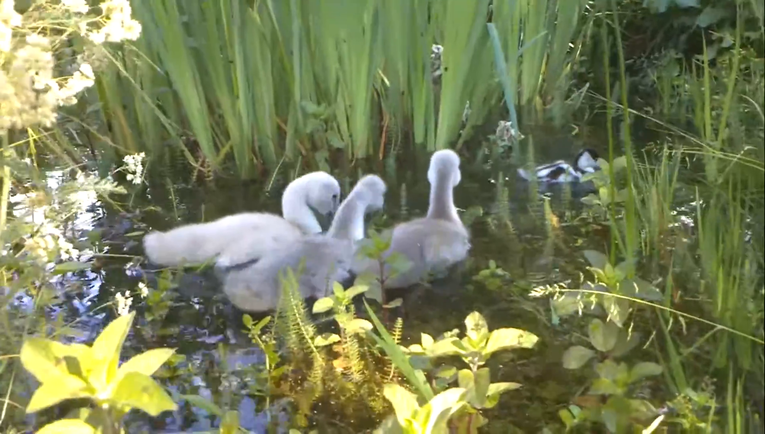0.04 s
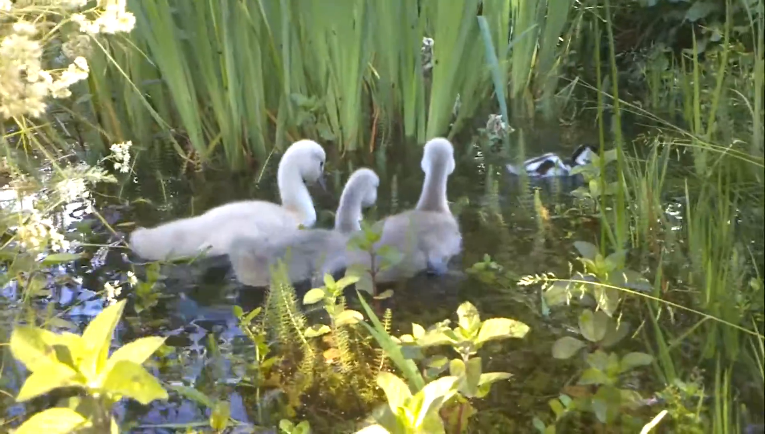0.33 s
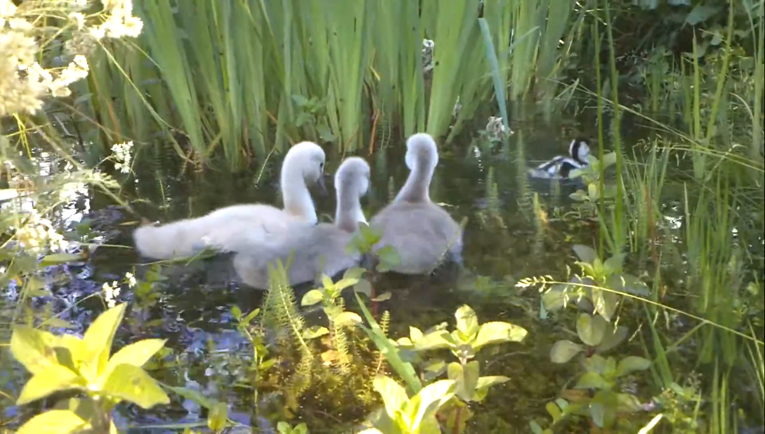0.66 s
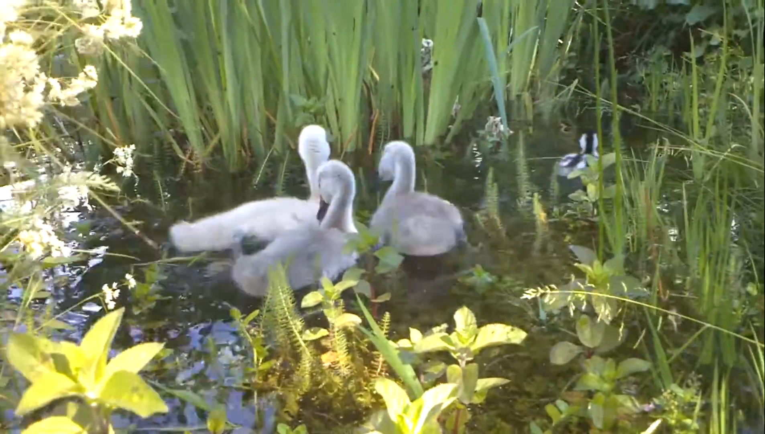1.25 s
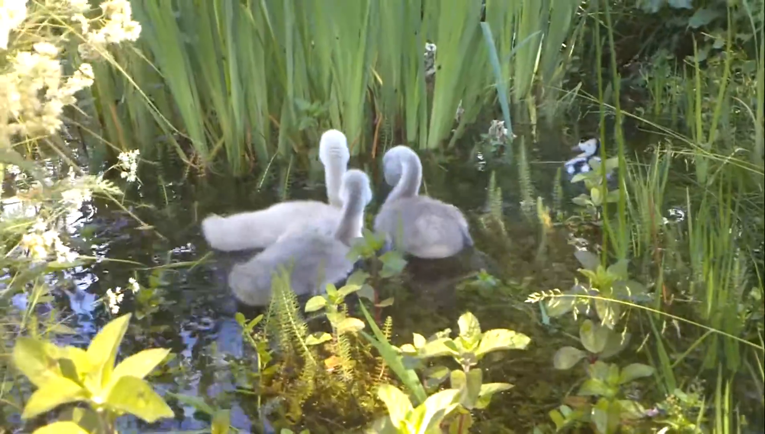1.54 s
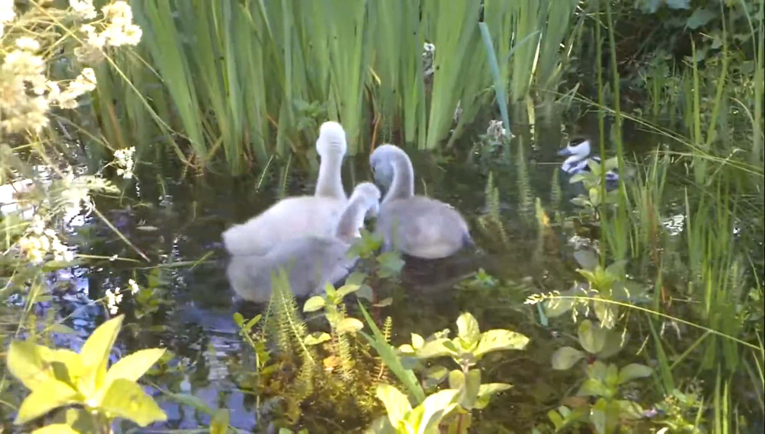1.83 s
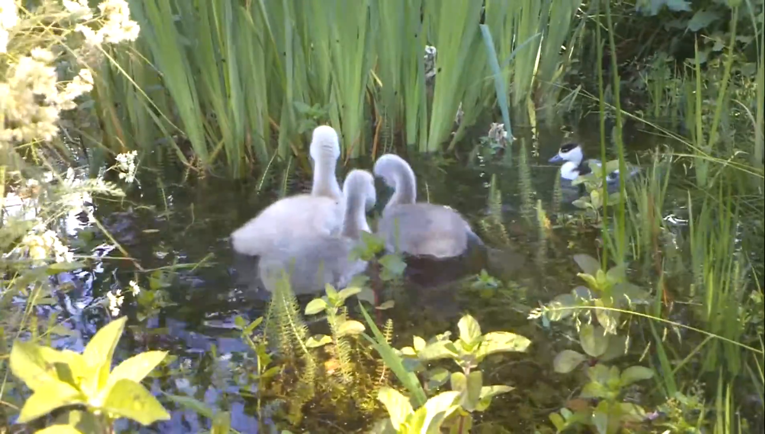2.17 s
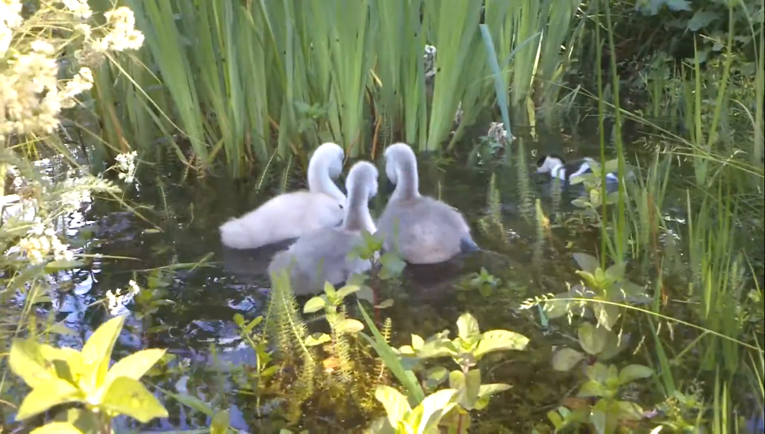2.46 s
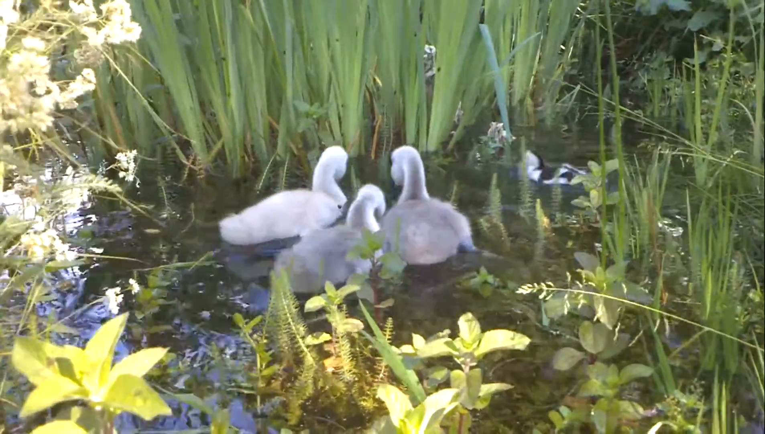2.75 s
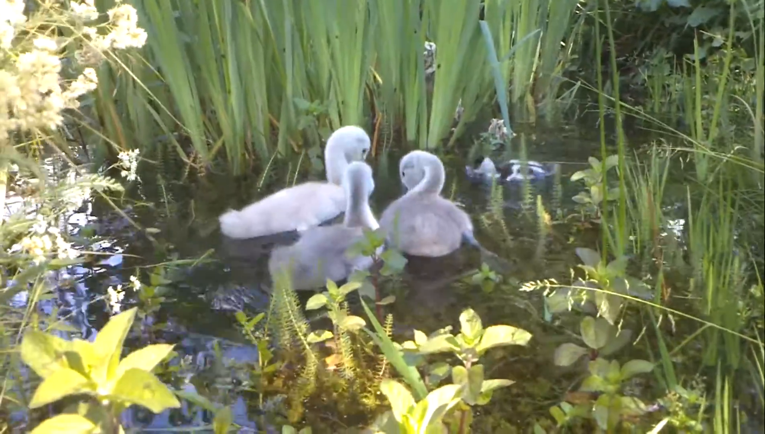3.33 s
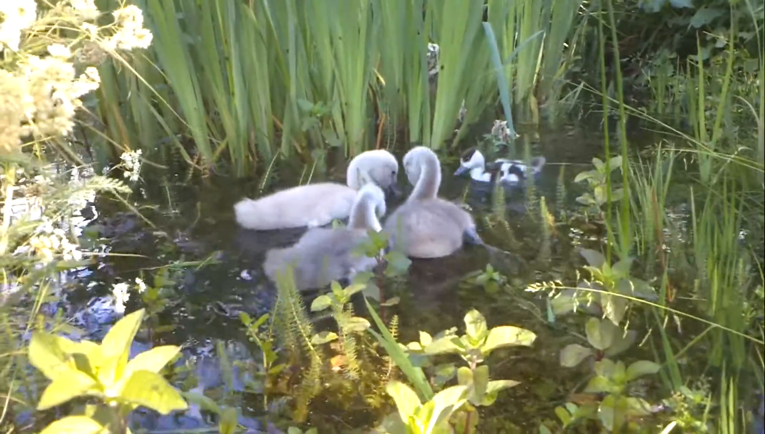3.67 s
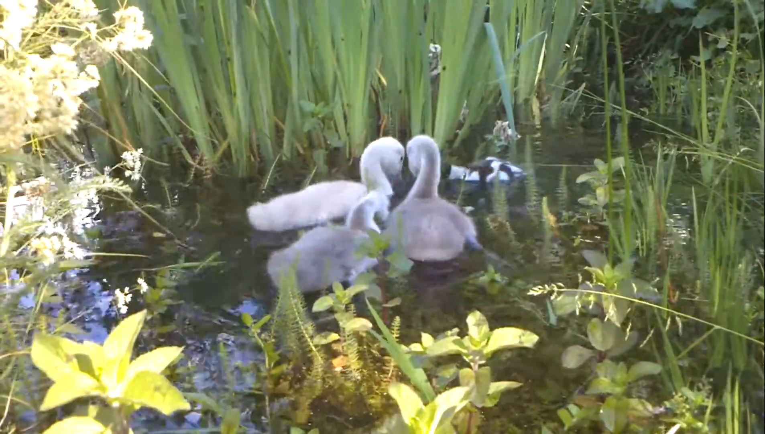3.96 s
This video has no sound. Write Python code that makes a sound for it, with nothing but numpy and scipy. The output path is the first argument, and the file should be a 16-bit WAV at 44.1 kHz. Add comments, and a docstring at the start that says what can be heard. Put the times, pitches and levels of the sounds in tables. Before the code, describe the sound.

Faint peeps and chirps of young waterbirds, with small splashes, hiss and low wind buffets.

```python
"""Cygnets on a reedy pond

Cygnets paddle and give soft arched peeps; another young bird runs off short falling chips.
Both calls reflect off the bank. Bills dabble: drops tick on the water, small splashes fizz
and a few bubbles rise. A light wind buffets the microphone over a steady high hiss."""
import sys
import numpy as np
from scipy import signal
from scipy.fft import rfft, irfft
from scipy.io import wavfile
from scipy.ndimage import uniform_filter1d

SR = 44100
rng = np.random.default_rng(int(sys.argv[2]) if len(sys.argv) > 2 else 0)


def pcm_store(signal):
    """Save signal as 16-bit PCM."""
    levels = np.round(np.clip(np.atleast_2d(signal), -1, 1) * 32767)
    wavfile.write(sys.argv[1], SR, levels.astype(np.int16).T)


N = 176400


def undb(db):
    """Decibels to gain."""
    return 10 ** (np.asarray(db) / 20)


def unit(x):
    """Scale to rms 1."""
    return x / np.sqrt(np.mean(x ** 2) + 1e-20)


def add(out, start_s, x):
    """Mix x into out at start_s."""
    i = max(int(start_s * SR), 0)
    out[i:i + len(x)] += x[:max(len(out) - i, 0)]


def curve(rows):
    """Join (time [s], value) rows by straight lines."""
    return np.interp(np.arange(N) / SR, *np.array(rows).T)


def band(x, hz, width_hz):
    """One resonance applied twice for steep sides, rms 1."""
    b, a = signal.iirpeak(min(hz, SR / 2 - 1), hz / min(width_hz, SR / 4), fs=SR)
    return unit(signal.lfilter(b, a, signal.lfilter(b, a, x)))


def coloured(spectrum):
    """Noise shaped by (frequency [Hz], density [dB]) rows, rms 1."""
    hz, db = np.array(spectrum).T
    bins_hz = np.arange(N // 2 + 1) * SR / N
    gain = undb(np.interp(np.log(bins_hz + 1), np.log(hz), db))
    return unit(irfft(rfft(rng.standard_normal(N)) * gain, N))


def wander(rate_hz, size=N):
    """Smooth random drift, rms about 1."""
    span = max(int(SR / rate_hz), 1)
    return unit(uniform_filter1d(uniform_filter1d(rng.standard_normal(N), span), span))[:size]


def thump(hz, t):
    """One smooth pressure swing centred on t = 0."""
    u = np.pi * hz * t
    return (1 - 2 * u ** 2) * np.exp(-u ** 2)


# gust strength (time [s], level [dB])
GUSTS = [(0, -42), (.3, -48), (.56, -40), (.8, -39), (1.0, -45.5), (1.13, -36.5), (1.33, -43.5),
         (1.55, -42), (1.8, -47), (1.9, -38), (2.06, -41.5), (2.16, -35), (2.62, -34.5), (2.8, -40),
         (2.99, -40), (3.07, -48.5), (3.25, -40), (3.34, -50.5), (3.52, -42), (3.7, -47.5), (3.83, -41),
         (4, -35)]
# turbulence spectrum (frequency [Hz], relative density [dB])
WIND_SPECTRUM = [(15, -5), (22, 4), (58, 1), (100, -7.5), (150, -16.5), (240, -24.5), (320, -36.5),
                 (450, -61), (800, -90)]
# single eddies (time [s], level [dB], pitch [Hz])
EDDIES = [(0.38, -32.5, 66), (0.545, -26.5, 47), (1.129, -27, 57.5), (1.558, -31, 95), (1.893, -31, 51),
          (2.139, -26, 55), (2.185, -28.5, 85.4), (2.231, -21.5, 69), (2.273, -24, 109), (2.356, -25.5, 71),
          (2.47, -25.5, 78), (2.537, -24, 55), (2.651, -24, 89), (2.806, -39.5, 130), (3.817, -31.5, 86)]


def wind():
    """Low turbulence follows the gusts; eddies thump the microphone and stir a brief flutter."""
    out = coloured(WIND_SPECTRUM) * undb(curve(GUSTS) + 1.5 * wander(rate_hz=54))
    flutter = undb(-25.5) * band(rng.standard_normal(N), hz=130, width_hz=134)
    flutter_s, cutoff_hz = 0.016, 333
    for centre_s, db, hz in EDDIES:
        t = np.arange(N) / SR - centre_s
        sharp_front = undb(-16) * thump(2.18 * hz, t)
        out += undb(db) * (thump(hz, t) + sharp_front + flutter * np.exp(-(t / flutter_s) ** 2))
    return signal.sosfilt(signal.butter(4, cutoff_hz, fs=SR, output="sos"), out)


# hiss spectrum (frequency [Hz], relative density [dB])
HISS_SPECTRUM = [(100, 0), (300, -3.5), (550, -7), (800, -8.5), (1200, -7), (1600, -6.5), (2050, -11),
                 (2600, -12), (4000, -9.5), (6900, -9.5), (9000, -5), (10200, -3), (11100, -9.5),
                 (12000, -16.5), (13000, -38)]
# hiss strength (time [s], level [dB])
HISS_LEVEL = [(0, -57.5), (.7, -58.5), (2.3, -58.5), (4, -60)]


def hiss():
    """Steady broadband noise with a slight waver in level."""
    return coloured(HISS_SPECTRUM) * undb(curve(HISS_LEVEL) + 0.66 * wander(rate_hz=11))


def droplets(size, hz, log_spread, per_s, decay_cycles):
    """Many tiny bubbles, each ringing briefly at its own pitch and strength; rms 1."""
    out, t = np.zeros(size), np.arange(SR // 50) / SR
    count = int(per_s * size / SR) + 2
    for position, up, down, strength in rng.random((N // 50, 4))[:count]:
        ring_hz = min(hz * np.exp(log_spread * np.sqrt(6) * (up - down)), SR / 3)
        ring = np.sin(2 * np.pi * ring_hz * t * (1 + 4 * t)) * np.exp(-ring_hz * t / decay_cycles)
        scatter_db = 2 * min(-np.log(1 - strength), 4)
        add(out, position * size / SR, undb(scatter_db) * ring)
    return unit(out)


# low wash of stirred water (time [s], level [dB])
WASH_LEVEL = [(0, -82), (1.2, -75), (3, -70), (4, -68)]
# gurgle of paddling (time [s], level [dB])
GURGLE_LEVEL = [(0, -75), (1.6, -72.5), (1.85, -65.5), (2.4, -72), (2.9, -68.5), (3.4, -65), (4, -67)]
# trickle off the bills (time [s], level [dB])
TRICKLE_LEVEL = [(0, -73), (2.4, -80), (2.9, -68), (3.15, -70), (3.45, -61), (3.7, -77), (4, -69)]


def lapping():
    """Paddling stirs a faint wash and gurgle; water trickles off the bills."""
    wash = band(rng.standard_normal(N), hz=450, width_hz=520)
    gurgle = droplets(N, hz=1434, log_spread=0.397, per_s=260, decay_cycles=2.24)
    trickle = droplets(N, hz=4210, log_spread=0.329, per_s=700, decay_cycles=5.6)
    return (undb(curve(WASH_LEVEL)) * wash + undb(curve(GURGLE_LEVEL)) * gurgle
            + undb(curve(TRICKLE_LEVEL)) * trickle)


def whistle(hz, fade_share, flutter_db, octave_db):
    """An unsteady tone that swells and fades; its octave is strongest midway."""
    n = len(hz)
    u = np.linspace(0, 1, n)
    jitter = 1 + 0.011 * wander(rate_hz=320, size=n)
    phase = 2 * np.pi * np.cumsum(hz * jitter) / SR
    swell = np.sin(np.pi / 2 * np.clip(np.minimum(u, 1 - u) / fade_share, 0, 1))
    flutter = undb(flutter_db * wander(rate_hz=190, size=n))
    octave = undb(octave_db) * np.exp(-((u - 0.5) / 0.58) ** 2) * np.sin(2 * phase)
    return np.sqrt(2) * swell * flutter * (np.sin(phase) + octave)


def bank_reflection(call, lag_ms, echo_db):
    """A call plus its echo off the bank; as the pitch glides, the two add and cancel in turn."""
    gap, echo_gain = np.zeros(int(lag_ms * SR / 1000)), undb(echo_db)
    return (np.r_[call, gap] + echo_gain * np.r_[gap, call]) / np.hypot(1, echo_gain)


# arched calls (time [s], length [s], top pitch [Hz], arch depth [share of top pitch], level [dB],
# octave re fundamental [dB], echo lag [ms])
PEEP_CALLS = [(0.029, 0.07, 2696, 0.15, -53, -30, 2.6), (0.119, 0.056, 2585, .07, -59, 0.5, 3.9),
              (0.161, 0.067, 2675, 0.16, -59.5, -25, 3.1), (0.164, 0.021, 2260, .05, -61, -25, 2.9),
              (0.226, 0.055, 2220, .06, -68, -14, 2.9), (0.309, 0.066, 2650, 0.17, -62, -10, 3.14),
              (0.437, 0.06, 2235, .03, -68.5, -5, 3.14), (1.386, 0.077, 2580, .16, -62, -10, 3.4),
              (1.513, 0.083, 2610, 0.18, -62.5, -13, 2.34), (1.589, 0.087, 2335, 0.063, -61.5, -20, 2.6),
              (1.658, 0.071, 2760, 0.15, -63.5, -13, 4.2), (1.781, 0.088, 2430, 0.089, -59.5, -17, 2.49),
              (3.516, 0.098, 2380, .11, -66, -8, 2.55), (3.741, 0.096, 2574, 0.17, -64.5, -18, 2.8),
              (3.95, .08, 2530, 0.17, -65, -18, 3.1)]


def peeps():
    """Each cygnet peep rises and falls in one bell-shaped arch, beating with its echo."""
    out = np.zeros(N)
    for start_s, length_s, top_hz, depth, db, octave_db, lag_ms in PEEP_CALLS:
        u = np.linspace(0, 1, int(length_s * SR))
        arch = np.abs(np.sin(np.pi * u ** 1.08)) ** 1.604  # rise slower than fall
        hz = top_hz * (1 - depth * (1 - arch))
        peep = whistle(hz, fade_share=0.21, flutter_db=2, octave_db=octave_db)
        add(out, start_s, undb(db) * bank_reflection(peep, lag_ms, echo_db=-5))
    return out


# drops on the water (time [s], relative level [dB], ring [Hz], plop gain [dB], crack gain [dB])
DROP_HITS = [(0.0295, -28, 9830, -31, -26), (1.1509, -37.5, 9900, -18, -7), (1.625, -45, 5040, 9.5, -2),
             (2.177, -39, 9200, -23, -12), (2.549, -45, 2810, 11.5, -15), (2.5592, -37.5, 8800, -20, -18),
             (2.6823, -37.5, 9100, -4, -8), (2.714, -36.5, 10000, -7, -4.5), (2.945, -38, 9800, -11, 0),
             (3.003, -32.5, 8300, -14, -3.5), (3.118, -35, 10200, -13, 3), (3.1977, -25.5, 8760, -18, -8),
             (3.2702, -35.5, 3000, 1.5, 6), (3.298, -39.5, 9800, 0, -8), (3.355, -38, 8100, -21, -18),
             (3.3731, -32, 8500, -1.5, 0.5), (3.4024, -31.5, 8800, -18, -9), (3.6518, -23, 9900, -13, -7.5),
             (3.7428, -30, 9000, -16, -7.5), (3.838, -31.5, 9800, -1, 6), (3.9066, -42, 8750, -12, -3),
             (3.925, -39.5, 8960, -2, 0)]


def drops():
    """One sharp impact rings as a tick, with a few milliseconds of spray and a dull plop."""
    out, t = np.zeros(N), np.arange(SR // 10) / SR
    impact_s, spray_s, tail_s, plop_s = 0.0007, 0.0047, 0.013, 0.0033
    ring_width_hz, crack_band = 2150, dict(hz=5500, width_hz=10200)
    spray_decay = undb(-5.5) * np.exp(-t / spray_s) + undb(-18.5) * np.exp(-t / tail_s)
    spray_envelope = np.minimum(t / impact_s, 1) * spray_decay
    impact = signal.unit_impulse(len(t), int(impact_s * SR))
    for start_s, db, ring_hz, plop_db, crack_db in DROP_HITS:
        ring_noise, crack_noise, plop_noise = rng.standard_normal((3, len(t)))
        tick = band(impact, ring_hz, ring_width_hz) + undb(crack_db) * band(impact, **crack_band)
        spray = band(ring_noise, ring_hz, ring_width_hz)
        spray += undb(crack_db - 3) * band(crack_noise, **crack_band)
        plop = undb(plop_db) * np.exp(-t / plop_s) * band(plop_noise, hz=1130, width_hz=630) / 2
        add(out, start_s, undb(db - 6.5) * (undb(-26.5) * tick + spray_envelope * spray + plop))
    return out


# falling calls (time [s], top pitch [Hz], level [dB])
CHIP_CALLS = [(0.841, 3340, -59), (1.016, 3576, -53.5), (1.168, 3530, -53.5), (1.317, 3530, -55),
              (1.46, 3490, -58.5), (1.613, 3540, -55.5), (1.767, 3605, -51), (1.932, 3660, -49.5),
              (2.087, 3610, -52), (2.252, 3660, -49)]
# chip contour (time [share of length], pitch [share of top pitch])
CHIP_GLIDE = [(0, .87), (.2, .96), (.36, 1), (.62, .94), (1, .835)]


def chips(length_s=0.027):
    """A young bird chips about six times a second: a hook up, a slide down, a short stop."""
    out, u = np.zeros(N), np.linspace(0, 1, int(length_s * SR))
    glide = np.interp(u, *np.array(CHIP_GLIDE).T)
    for start_s, top_hz, db in CHIP_CALLS:
        chip = whistle(top_hz * glide, fade_share=0.36, flutter_db=1.5, octave_db=-24)
        add(out, start_s, undb(db) * bank_reflection(chip, lag_ms=5, echo_db=-8.5))
    return out


# bill splashes (time [s], length [s], level [dB], fizz centre [Hz], slosh re fizz [dB])
DABBLES = [(1.607, 0.037, -56, 3340, -6.5), (1.654, 0.099, -62.5, 3470, -11),
           (2.148, 0.059, -56.5, 3250, -2), (2.844, .04, -60.5, 5900, 3.5), (2.932, 0.06, -55.5, 5500, -13),
           (2.998, 0.029, -56, 7900, -11.5), (3.369, 0.038, -47.5, 8600, -6.5),
           (3.435, .055, -52.5, 7800, -7), (3.532, 0.044, -54, 5450, -8)]


def splashes():
    """Dabbling bills throw short showers of droplets over a low slosh."""
    out = np.zeros(N)
    for start_s, length_s, db, fizz_hz, slosh_db in DABBLES:
        u = np.linspace(0, 1, int(length_s * SR))
        fizz = droplets(len(u), hz=fizz_hz, log_spread=0.224, per_s=1500, decay_cycles=16)
        slosh = droplets(len(u), hz=1330, log_spread=0.29, per_s=450, decay_cycles=1.5)
        envelope = np.minimum(u / 0.15, 1) * (1 - u) ** 0.66
        add(out, start_s, undb(db) * envelope * (fizz + undb(slosh_db) * slosh))
    return out


# single bubbles (time [s], length [s], start pitch [Hz], end pitch [Hz], level [dB])
BUBBLE_RINGS = [(2.843, .016, 1090, 1490, -56), (2.865, .016, 1600, 1470, -58.5),
                (3.325, 0.029, 896, 1526, -53), (3.37, .015, 1290, 1480, -57.5),
                (3.382, .02, 2110, 2240, -58), (3.485, .04, 4300, 5100, -62.5)]


def bubbles():
    """Bubbles ring and glide, most of them upward as they near the surface."""
    out = np.zeros(N)
    for start_s, length_s, from_hz, to_hz, db in BUBBLE_RINGS:
        u = np.linspace(0, 1, int(length_s * SR))
        glide_hz = from_hz + (to_hz - from_hz) * u
        wobble = 1 + 0.015 * wander(rate_hz=520, size=len(u))
        ring = whistle(glide_hz * wobble, fade_share=0.2, flutter_db=1.1, octave_db=-28)
        add(out, start_s, undb(db) * np.exp(-0.7 * u) * ring)
    return out


def scene():
    """Hiss, birds, water and wind in the open air; mono."""
    return (hiss() + peeps() + chips() + drops() + splashes() + lapping() + bubbles() + wind())[None]


def record(dry):
    """Steep low-pass at 11.5 kHz."""
    return signal.sosfilt(signal.butter(18, 11500, fs=SR, output="sos"), dry)


dry = scene()
out = record(dry)
pcm_store(out)
```